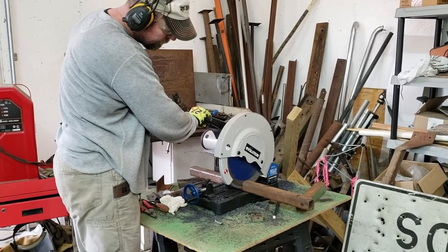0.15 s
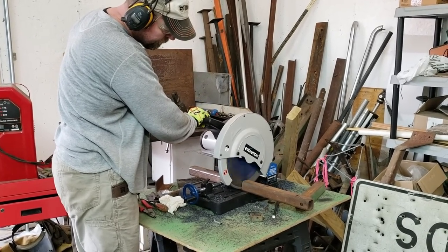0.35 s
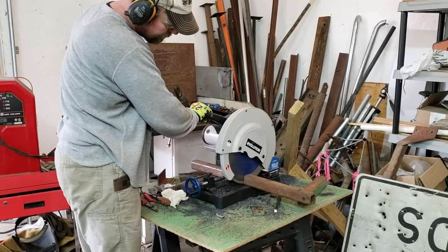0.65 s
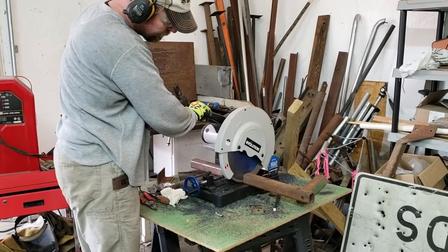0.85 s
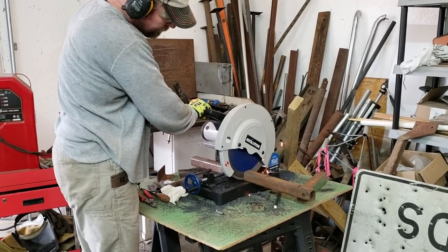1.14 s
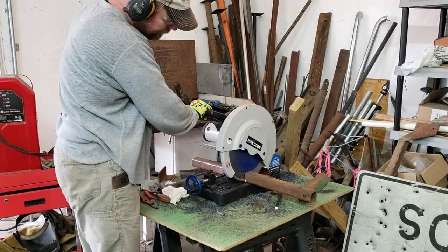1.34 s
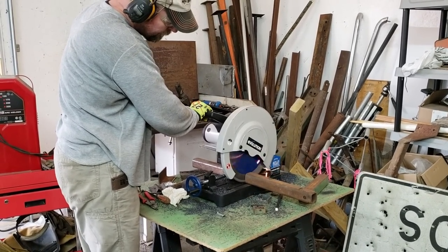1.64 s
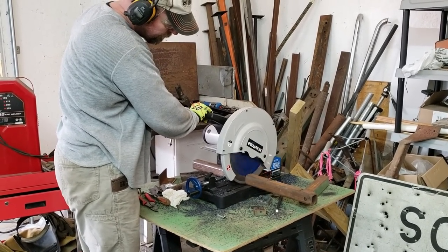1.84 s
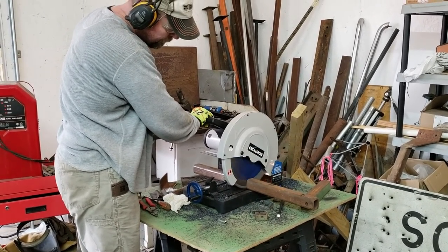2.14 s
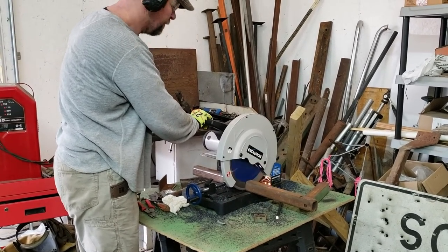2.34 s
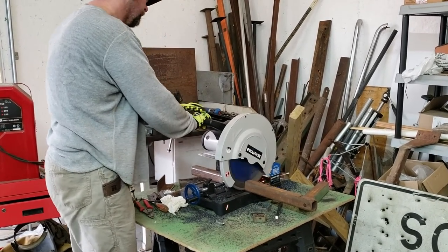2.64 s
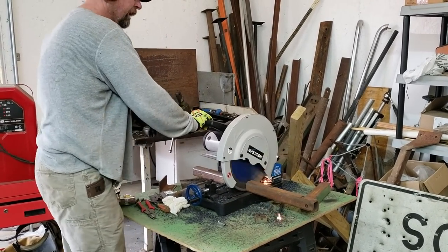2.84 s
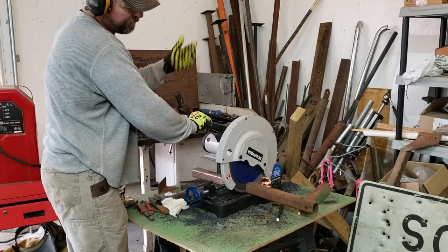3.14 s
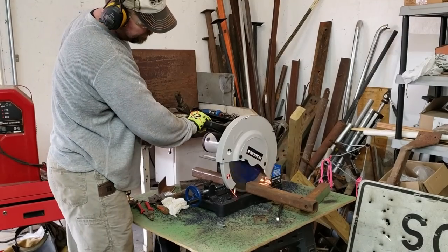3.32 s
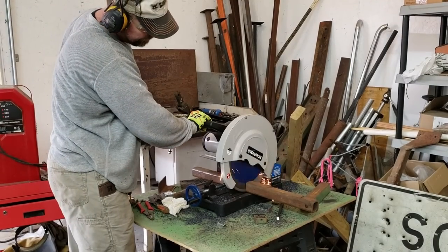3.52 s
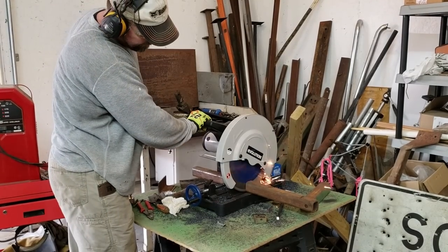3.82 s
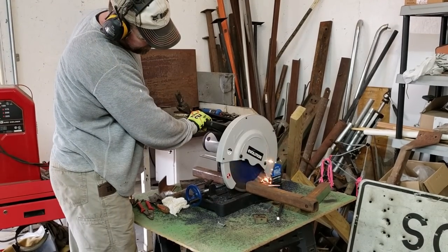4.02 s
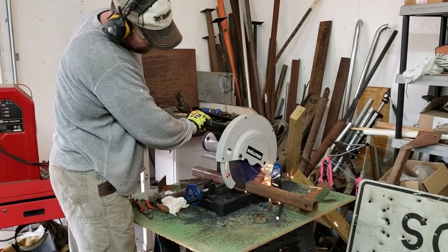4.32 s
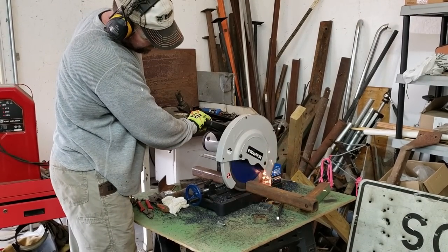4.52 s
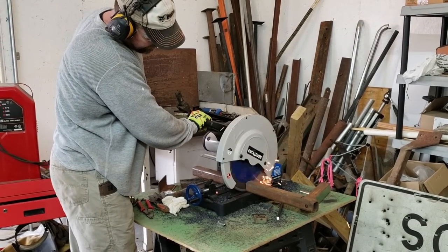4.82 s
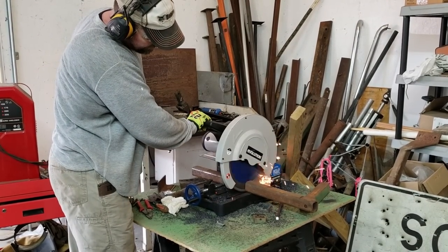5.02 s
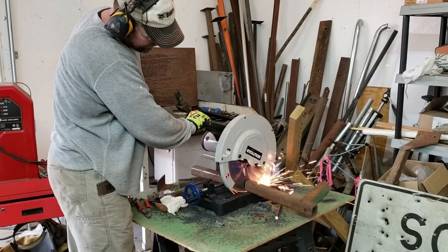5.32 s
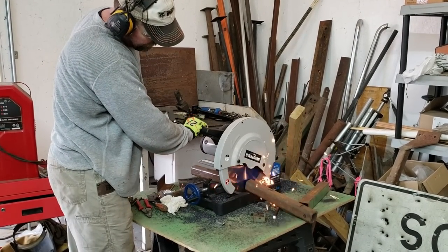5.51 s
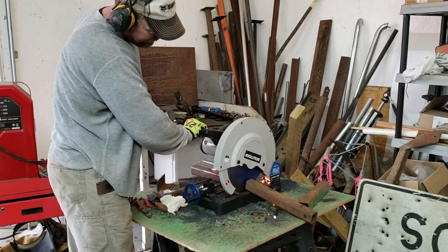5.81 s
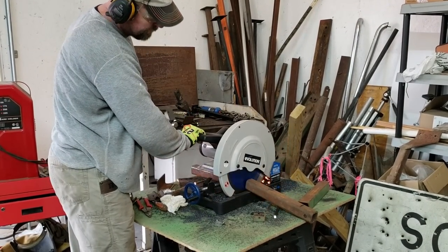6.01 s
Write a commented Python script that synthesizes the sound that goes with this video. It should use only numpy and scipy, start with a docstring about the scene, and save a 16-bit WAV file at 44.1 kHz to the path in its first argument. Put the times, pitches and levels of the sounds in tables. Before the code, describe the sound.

A chop saw grinds harshly through steel pipe, then breaks into a piercing, wavering high squeal before lifting clear to a faint whirring motor.

```python
"""Chop saw cutting a steel pipe

A chop saw bites into a steel pipe on a bench in a hard-walled workshop, heard at a pair of ports a few metres away.
Random chip impacts excite the resonances of pipe, blade and bench, each modelled as noise under mode peaks.
Under light feed the blade locks into a two-tone stick-slip squeal, modelled as sines with related partials.
Snags and thumps are short noise bursts; single modes ring briefly. At last the blade lifts clear,
and the unloaded motor speeds up: a rising sine whine over the broad noise of its fan."""
import sys
import numpy as np
from scipy import signal
from scipy.fft import rfft, irfft
from scipy.io import wavfile
from scipy.ndimage import uniform_filter1d

SR = 44100
rng = np.random.default_rng(int(sys.argv[2]) if len(sys.argv) > 2 else 0)


def transcribe(u):
    """Save the signal u as a 16-bit wav file named by the first command-line argument.

    u: samples, shape (n,) or (channels, n), limited to [-1, 1]; the rate is SR.
    q: integer samples, one column per channel.
    """
    v = np.clip(np.atleast_2d(u).T, -1, 1)
    q = np.round(v * 32767).astype(np.int16)
    wavfile.write(sys.argv[1], SR, q)


N = 271634

# Feed of the blade. Each row: time in seconds, pipe rasp in dB, bench rumble relative to the rasp in dB,
# blade hiss relative to the rasp in dB.
FEED = [(0.0, -35, -19, 3), (0.36, -35.5, -18, 4), (0.5, -34.5, -18, 4.5), (0.55, -39.5, -16, -1.5),
        (0.84, -48, -5, 1.5), (1.12, -38, -4, 1.5), (1.37, -34, -6, 3), (1.99, -33, -10, 3.5),
        (2.13, -34.5, -11, -1.5), (2.19, -47.5, -11, 1), (2.75, -45.5, -9, 4.5), (2.8, -37.5, -12, 3),
        (2.982, -39.5, -8, 5.5), (3.015, -60.5, -4, 1), (3.32, -62.5, -9.5, 5), (3.35, -58, -8.5, 8.5),
        (4.24, -56, -7, 10), (4.74, -49.5, -11, -2), (4.84, -53.5, -10, -10), (5.3, -57.5, -4.5, 8),
        (5.46, -51.5, -12.5, 7), (5.68, -66.5, 2, -6), (5.78, -73.5, 2, -10), (6.16, -71.5, 1, -11)]
# Judder of the blade in the kerf. Each row: centre in seconds, length in seconds, rise of the bench in dB,
# rise of the pipe body in dB.
JUDDERS = [(4.195, 0.08, 5.5, 6), (4.918, 0.11, 12, 10.5), (5.152, 0.099, 12, 8), (5.5, 0.12, 7, 1.5)]
# Spectrum of the chip impacts. Each row: frequency in Hz, relative level in dB per Hz.
CHIP_SPECTRUM = [(30, -21), (62, -15.5), (125, -5), (190, -4.5), (310, -4), (420, -7), (560, -2), (800, -2),
                 (1000, -6), (1400, -3.5), (2500, -3.5), (6500, -9), (9500, -13.5), (12000, -5),
                 (15800, -9.5)]
# Modes of pipe, blade and bench. Each row: frequency in Hz, width scale in Hz, relative level in dB.
PIPE_MODES = [(1180, 40, -9), (1270, 50, -10), (1970, 28, -8), (2085, 25, -7), (2230, 35, -7),
              (2395, 25, -8), (2570, 26, -8), (2810, 110, -10), (2910, 33, -10), (3240, 40, -11),
              (3590, 40, -8), (3890, 67, -8), (4140, 56, -8), (4310, 58, -10), (4760, 40, -7),
              (5405, 50, -4), (5515, 70, -5), (5890, 47, -10), (6085, 32, -2), (6280, 30, -6),
              (6490, 46, -2), (6790, 43, 1), (7020, 40, -3), (7320, 37, -2), (7570, 58, -4), (8160, 58, -7)]
BLADE_MODES = [(8790, 170, -10), (9330, 150, -10), (9930, 76, -8), (10400, 150, -10), (10700, 46, -8),
               (11600, 27, -2), (11800, 44, -4), (11900, 30, -4), (12100, 24, -8), (12500, 120, -3),
               (12900, 92, -7), (13300, 58, -4), (13500, 37, -7), (13900, 17, -9), (14100, 45, -8),
               (14500, 49, -10), (15100, 200, -10), (15500, 47, -11)]
BENCH_MODES = [(103, 16, 4), (139, 12.4, 6.5), (233, 57, -0.5), (328.5, 17, 4.5), (495, 38, 3),
               (543, 31, 5.5), (675, 24, 6)]
# Difference of the two ports. Each row: frequency in Hz, left minus right in dB, likeness from 0 to 1.
PORTS = [(40, -6, 0.3), (129, 0.5, 0.59), (407, -1, 0.45), (1570, 3.5, 0.09), (3800, 2, 0), (6360, 6.5, 0),
         (8000, 5.5, 0.29), (11000, -1.5, .01), (11000, -11, 0.28), (14100, 1, 0), (16000, 0, 0.55)]
# Held squeal under light feed. Each row: time in seconds, lower tone in dB, upper tone in dB.
HELD_SQUEAL = [(3.36, -43, -54), (3.39, -45, -49), (3.48, -33.5, -54), (3.54, -30, -42), (3.71, -43, -44),
               (3.76, -42, -56), (3.87, -37, -41), (4.11, -41.5, -37), (4.17, -34, -35), (4.58, -34, -38),
               (4.77, -43.5, -43), (4.87, -26, -33.5), (4.95, -29, -28.5), (5.04, -32.5, -35.5),
               (5.15, -27.5, -30.5), (5.35, -34, -42), (5.43, -48, -35), (5.59, -56, -62), (5.66, -83, -84)]
# Squeaks as the blade locks and lets go. Each row: peak in seconds, hold in seconds, lower tone in dB,
# upper tone in dB.
SQUEAKS = [(1.585, 0.039, -36, -46), (1.75, 0.016, -31.5, -44), (1.96, .01, -31, -41),
           (2.141, 0.052, -22, -38), (2.262, 0.094, -31.5, -34), (2.991, 0.0043, -20.5, -37),
           (3.055, 0.011, -37, -33), (3.115, 0.0084, -32, -42), (3.235, 0.035, -31, -38.5),
           (3.338, .005, -34, -51)]
# Lower squeal tone. Each row: time in seconds, pitch in Hz, left minus right in dB.
LOWER_TONE = [(1.5, 11592, -9.0), (1.94, 11590, -12.5), (3.68, 11605, -10.0), (4.21, 11611, -3.0),
              (5.44, 11628, -12.5), (5.7, 11615, -8.5)]
# Upper squeal tone. Each row: time in seconds, pitch in Hz, lag of the right port in radians.
UPPER_TONE = [(2.2, 12309, -1.4), (3.3, 12296, -2.7), (3.7, 12292, -2.7), (4.2, 12286, -1.4),
              (5.42, 12272, -1.7)]
# Partials locked to the squeal. Each row: multiple of the lower tone, multiple of the upper tone.
PARTIAL_ORDERS = [(1, 0), (0, 1), (.6643, 0), (.329, 0), (0, .6824), (0, .997), (1.01, 0), (0, 1.0782),
                  (0, 1.0458), (2, -1)]
# The same partials. Each row: relative level in dB, left minus right added to the lower tone's in dB,
# lag of the right port in radians.
PARTIAL_LEVELS = [(0, -2, 4), (0, 3.5, 0), (-23, 3, 2.7), (-37, 1, 1.5), (-18, 5, 0), (-15, 8, 0),
                  (-24, -4, 4.5), (-18, 8, 0), (-18, -3, 0), (-30, 4, -1.5)]
# Third blade mode that joins the squeal. Each row: time in seconds, level in dB.
THIRD_MODE = [(2.98, -62), (3.06, -53), (3.18, -57), (3.27, -54), (3.46, -55), (3.6, -50), (3.77, -58),
              (4.04, -46), (4.19, -44), (4.47, -56), (4.79, -61), (4.87, -43), (5.03, -49), (5.16, -42),
              (5.3, -58), (5.46, -59), (5.6, -80)]
# Pipe mode that sings at the first bite. Each row: time in seconds, level in dB.
FIRST_BITE = [(0.0, -57), (0.026, -54), (0.244, -43.5), (0.266, -46), (0.392, -43.5), (0.414, -57),
              (0.45, -37), (0.518, -42.5), (0.582, -59), (0.612, -46), (0.64, -47.5), (0.72, -66)]
# Lone modes that swell and fade. Each row: start in seconds, end in seconds, frequency in Hz, level in dB.
LONE_MODES = [(.02, 0.143, 2560, -46), (.16, 0.293, 2914, -48), (0.285, .42, 2760, -50),
              (1.5, 2.17, 140, -55), (1.8, 2.18, 680, -54), (2.13, 2.447, 686, -61),
              (3.33, 3.854, 1266, -67), (3.35, 3.472, 2700, -65), (5.36, 5.492, 1183, -60),
              (5.18, 5.52, 2080, -66), (5.39, 5.62, 2715, -69), (5.48, 5.87, 2087, -65),
              (5.612, 5.93, 6200, -69)]
# Snags, thumps and settling. Each row: start in seconds, peak in dB, reference frequency in Hz (the passband
# runs from 1.1 to 3 times it, at most to 16 kHz), decay constant of the noise in seconds.
CLICKS = [(2.979, -44, 900, 0.0069), (3.343, -44, 11000, .005), (5.456, -43.5, 170, 0.04),
          (5.53, -49, 150, 0.067), (5.577, -49.5, 141, 0.065), (5.66, -50, 149, 0.055),
          (5.979, -53, 140, 0.047)]
# Motor whine. Each row: time in seconds, frequency in Hz, level in dB.
WHINE = [(5.62, 11600, -75), (5.77, 11980, -67), (5.95, 12430, -67), (6.16, 12870, -66)]

BODY_DB, BODY_PER_BENCH = 3.5, 0.63  # the pipe body follows the rasp and part of the bench's share
MODE_SWING_DB, MODE_FLANK_STEEPNESS = 4, 1.7
THICKET_CAP_DB = 2.5
BITE_DB, BITES_PER_S = 0.6, 20  # uneven bites move all the rasp together
BENCH_FLICKER_DB, THUD_FLICKER_DB = 1.0, 2.0
THUD_DB = -77.5  # low thud under light feed, before judder
USUAL_SQUEAL_DB = -40
RIM_HISS_DB, RIM_HISS_PER_SQUEAL = -42.5, 0.61  # level at the usual squeal, dB per dB
SKIN_DB = -9  # relative to the rasp
SKIN_FADES_FROM_S, SKIN_FADE_S = 0.51, 0.36
SKIN_SWING_DB, SKIN_BAND_HZ = 6, (1500, 5000)
SQUEAK_RISE_DB_PER_S, SQUEAK_FALL_DB_PER_S = 514, 193
SQUEAL_FLICKER_DB = 0.9
THIRD_PER_UPPER = 1.1051  # frequency ratio
FIRST_BITE_HZ = 1204
RING_WAVER_HZ, RING_FLICKER_DB = 4, 1.8
FAN_DB, FAN_RISE_S = -56.5, 0.21
SHOP_T60_S, SHOP_WET_DB = 0.3, -20
TOP_HZ = 15870

T = np.arange(N) / SR
HZ = np.maximum(np.arange(N // 2 + 1) * SR / N, 1)


def cut():
    """Forced vibration: the teeth drive the bench, pipe and blade; the rim also hisses with the squeal."""
    rasp_db, share_db, hiss_db = curves(FEED)
    bench_db = rasp_db + share_db
    body_db = rasp_db + BODY_DB + BODY_PER_BENCH * share_db
    thud_db = THUD_DB
    for s, length_s, to_bench_db, to_body_db in JUDDERS:
        bump = np.exp(-(2 * (T - s) / length_s) ** 4)
        bench_db = bench_db + to_bench_db * bump
        body_db = body_db + to_body_db * bump
        thud_db = thud_db + 1.6 * to_bench_db * bump
    singing_db = uniform_filter1d(squeal_db().mean(axis=0), SR // 30) - USUAL_SQUEAL_DB
    rim_db = RIM_HISS_DB + RIM_HISS_PER_SQUEAL * singing_db
    light_feed = (T > HELD_SQUEAL[0][0]) * (T < HELD_SQUEAL[-1][0])

    bench = mode_noise(BENCH_MODES, -4, 25, 970, 1.9, BENCH_FLICKER_DB, 0.69) * undb(bench_db)
    thud = mode_noise([], 0, 25, 96, 0.8, THUD_FLICKER_DB, 0.8) * undb(thud_db) * light_feed
    body = mode_noise(PIPE_MODES, 8.4, 1017, 4770, 0.51, 0.33, 4.13) * undb(body_db)
    wall = mode_noise(PIPE_MODES, 0.85, 4600, 10300, 0.82, 0.25, 3.3) * undb(rasp_db + 2.5)
    blade = mode_noise(BLADE_MODES, 11.3, 7800, 18000, 1.0, 0.66, 5.3) * undb(rasp_db + hiss_db)
    rim = mode_noise(BLADE_MODES, 2.4, 10900, 27000, 0.47, 1.0, 0.44) * undb(rim_db)
    skin_fade = np.clip(1 + (SKIN_FADES_FROM_S - T) / SKIN_FADE_S, 0, 1)
    spells = skin() * undb(rasp_db + SKIN_DB) * skin_fade
    bites = undb(BITE_DB * walk(BITES_PER_S))
    return (spells + bench + thud + body + wall + blade) * bites + rim


def mode_noise(modes, ring_db, lo_hz, hi_hz, chip_db, flicker_db, thicket_db):
    """Modal filtering: uneven random impacts are shaped by main modes over a thicket of weaker ones."""
    power = undb(2 * spectra(CHIP_SPECTRUM)[0]) * np.ones((2, 1))
    for hz, width, db in modes:
        # each mode is stronger at one contact point than at the other
        swing_db = MODE_SWING_DB * rng.choice([-1, 1]) * np.array([[1], [-1]])
        damping = min(50 / width, 1)  # strongly damped modes stand out less
        peak = 1 / (1 + (MODE_FLANK_STEEPNESS * (HZ - hz) / width) ** 2) ** 2
        power = power + undb(2 * (db + ring_db + swing_db)) * damping * peak
    gains = np.sqrt(power / (1 + (lo_hz / HZ) ** 10) / (1 + (HZ / hi_hz) ** 10))
    pan_db, alike = spectra(PORTS)
    alike = np.clip(alike, 0, 1)
    # the contact point wanders, so two thickets of small modes take turns
    turn = 2.383 * walk(6)
    pair = 0
    for share, gain in zip((np.cos(turn), np.sin(turn)), gains):
        chips = rng.standard_normal((2, N)) * undb(chip_db * walk(500))
        # here the walk runs along frequency, a new level every few tens of Hz
        thicket = undb(min(thicket_db, THICKET_CAP_DB) * walk(260)[:len(HZ)])
        mid, side = rfft(chips) * np.sqrt([1 + alike, 1 - alike]) * gain * thicket
        left = (mid + side) * undb(pan_db / 2)
        right = (mid - side) * undb(-pan_db / 2)
        pair = pair + share * irfft(np.array([left, right]), N)
    return unit_rms(pair * undb(flicker_db * walk(9.7)))


def skin():
    """Independent modes: each resonance of the uncut pipe sings by itself in short spells."""
    lo_hz, hi_hz = SKIN_BAND_HZ
    out = 0
    for hz, width, db in PIPE_MODES:
        if lo_hz < hz < hi_hz:
            phase = phase_of(hz + width / 5 * walk(29.1))
            out = out + undb(db + SKIN_SWING_DB * walk(10.4)) * tone(phase, 3.6, rng.uniform(-2.5, 1.5))
    return unit_rms(out)


def squeal():
    """Stick-slip oscillation: two blade modes sing with phase-locked partials, the weaker fainter at first."""
    lower, upper = (phase_of(curves(t)[0] + 1.83 * walk(29.98)) for t in (LOWER_TONE, UPPER_TONE))
    pan_db = curves(LOWER_TONE)[1]
    upper_lag = curves(UPPER_TONE)[1]
    early_db = np.interp(T, [2.4, 3.6], [-5, 0])
    lower_db, upper_db = squeal_db() + SQUEAL_FLICKER_DB * np.array([walk(14), walk(21)])
    out = np.zeros((2, N))
    for (a, b), (db, side_db, lag) in zip(PARTIAL_ORDERS, PARTIAL_LEVELS):
        parent_db = lower_db if b == 0 else upper_db
        own_db = db + parent_db + (db < -6) * (early_db + SQUEAL_FLICKER_DB * walk(16))
        if b < 0:  # a difference tone grows with both of its parents
            own_db = db + lower_db + upper_db - USUAL_SQUEAL_DB
        out += undb(own_db) * tone(a * lower + b * upper, pan_db + side_db, lag + (b > 0) * upper_lag)
    third = (T > THIRD_MODE[0][0]) * undb(curves(THIRD_MODE)[0] + 1.4 * walk(20))
    return out + third * tone(THIRD_PER_UPPER * upper, 14, 1.3)


def squeal_db():
    """Exponential growth and decay: straight dB ramps; the held squeal or the loudest squeak prevails."""
    before_s = np.maximum(HELD_SQUEAL[0][0] - T, 0)
    tones_db = np.array(curves(HELD_SQUEAL)) - SQUEAK_RISE_DB_PER_S * before_s
    for s, hold_s, *db in SQUEAKS:
        rise_db = SQUEAK_RISE_DB_PER_S * np.maximum(s - T, 0)
        fall_db = SQUEAK_FALL_DB_PER_S * np.maximum(T - s - hold_s, 0)
        tones_db = np.maximum(tones_db, np.reshape(db, (2, 1)) - rise_db - fall_db)
    return tones_db


def rings():
    """Modal resonance: single pipe and frame modes come up for a moment, each with a wandering pitch."""
    gain = (T < FIRST_BITE[-1][0]) * undb(curves(FIRST_BITE)[0] + RING_FLICKER_DB * walk(31.2))
    out = gain * tone(phase_of(FIRST_BITE_HZ + 6.4 * walk(25.0)), 0.46, 1.4)
    for start, end, hz, db in LONE_MODES:
        swell = np.clip(np.minimum(T - start, end - T) / 0.047, 0, 1)
        gain = swell * undb(db + RING_FLICKER_DB * walk(35))
        out += gain * tone(phase_of(hz + RING_WAVER_HZ * walk(25.18)), 1.3, 0.51)
    return out


def clicks():
    """Impulsive excitation: the blade snags twice, and the frame thumps and settles as it lets go."""
    out = np.zeros((2, N))
    to_ports = np.array([[1, 0.2], [1, -0.025]])  # nearly the same noise at both
    for s, db, hz, decay_s in CLICKS:
        decay = (T >= s) * np.exp(-np.abs(T - s) / decay_s)
        burst = to_ports @ rng.standard_normal((2, N)) * decay
        burst[:, int(s * SR)] += np.sqrt(decay_s * SR)  # the blow itself
        band_hz = [hz / 0.91, min(hz * 3, 16000)]
        burst = signal.sosfilt(signal.butter(2, band_hz, "band", fs=SR, output="sos"), burst)
        out += burst * undb(db) / np.abs(burst).max()
    return out


def motor():
    """Load and speed: as the motor sheds its load a thin whine climbs and the fan noise comes up."""
    hz, db = curves(WHINE)
    phase = phase_of(hz + 7.0 * walk(30))
    gain = (T > WHINE[0][0]) * undb(db + RING_FLICKER_DB * walk(20))
    whine = gain * np.array([0.6 * np.sin(phase), 0.86 * np.sin(phase + 0.4)])
    fan_rise = np.clip(1 + (T - WHINE[0][0]) / FAN_RISE_S, 0, 1)
    fan = mode_noise([], 0, 720, 12400, 0.36, 0.65, 3.0) * undb(FAN_DB) * fan_rise
    return whine + fan


def shop(x, wet_db):
    """Reverberation: the walls add an exponentially decaying tail, different at each port."""
    t = T[:SR // 2]
    decay = np.exp(-np.log(1000) * t / SHOP_T60_S) * (t > 0.006)
    tail = rng.standard_normal((2, len(t))) * decay
    tail = tail / np.sqrt(np.sum(tail ** 2) / 2)
    return x + undb(wet_db) * signal.fftconvolve(x, tail, axes=1)[:, :N]


def tone(phase, pan_db, lag):
    """Level and phase differences: a sine unequal at the two ports, rms 1 in their mean."""
    left, right = undb(pan_db / 2), undb(-pan_db / 2)
    mean = np.abs(left + right * np.exp(-1j * lag)) / np.sqrt(8)
    return np.array([left * np.sin(phase), right * np.sin(phase - lag)]) / mean


def phase_of(hz):
    """Phase is the running integral of frequency."""
    return 2 * np.pi * np.cumsum(hz) / SR


def walk(rate):
    """Band-limited fluctuation: random levels held 1 / rate s and smoothed twice; spread near 1."""
    k = int(SR / rate)
    held = rng.standard_normal(size=4096)[np.arange(N) // k % 4096]
    return 1.502 * uniform_filter1d(uniform_filter1d(held, k), k)


def curves(table):
    """Linear interpolation in time of a table's columns."""
    s, *columns = np.transpose(table)
    return [np.interp(T, s, c) for c in columns]


def spectra(table):
    """Linear interpolation on a log-frequency axis of a table's columns."""
    hz, *columns = np.transpose(table)
    return [np.interp(np.log(HZ), np.log(hz), c) for c in columns]


def undb(db):
    """Decibel law: 20 dB is a factor of ten in amplitude."""
    return 10 ** (np.asarray(db) / 20)


def unit_rms(x):
    """Normalisation: the mean of the channels gets an rms of 1."""
    return x / np.sqrt(np.mean(np.mean(np.atleast_2d(x), axis=0) ** 2))


def scene():
    """Superposition: the sources add; the squeal and clicks also excite the room."""
    return cut() + shop(squeal() + clicks(), SHOP_WET_DB) + rings() + motor()


def record(dry):
    """Band limiting: a steep elliptic low-pass removes the highest treble."""
    return signal.sosfilt(signal.ellip(14, 0.2, 70, TOP_HZ, fs=SR, output="sos"), dry)


dry = scene()
out = record(dry)
transcribe(out)
```